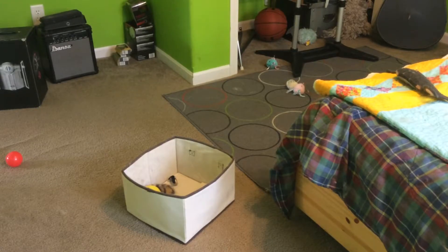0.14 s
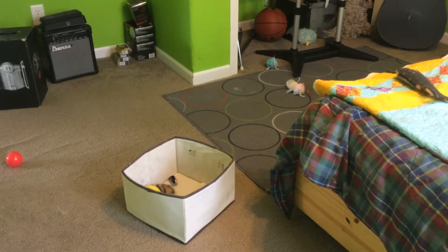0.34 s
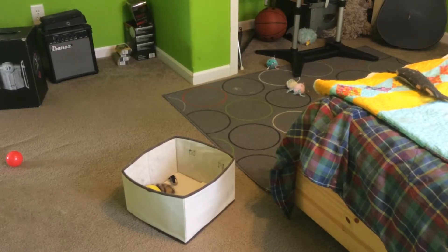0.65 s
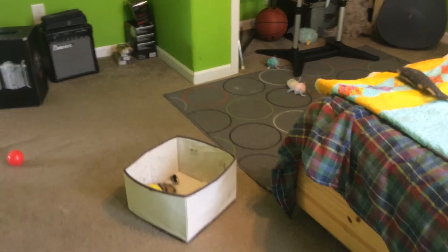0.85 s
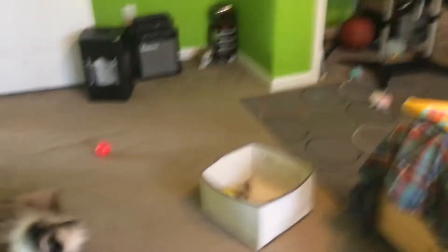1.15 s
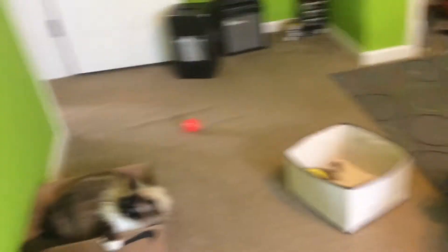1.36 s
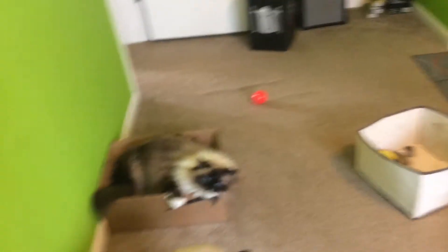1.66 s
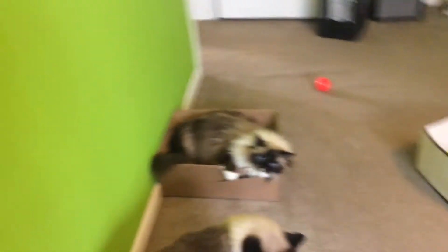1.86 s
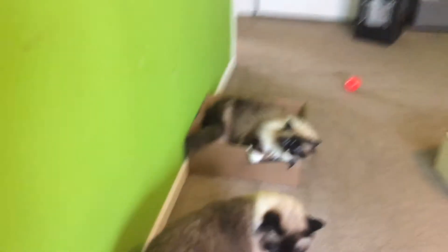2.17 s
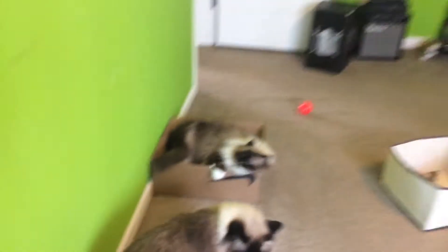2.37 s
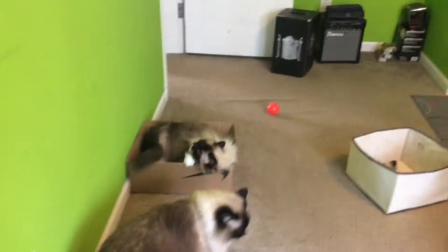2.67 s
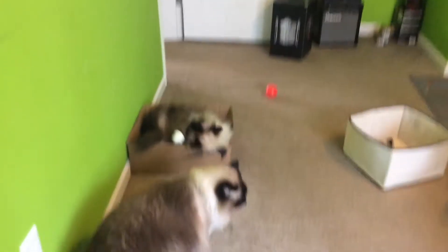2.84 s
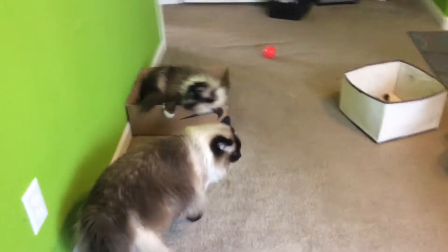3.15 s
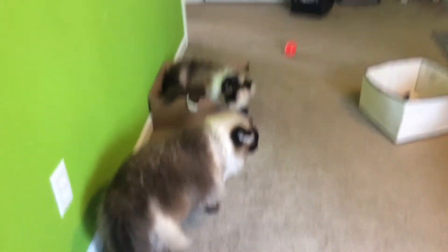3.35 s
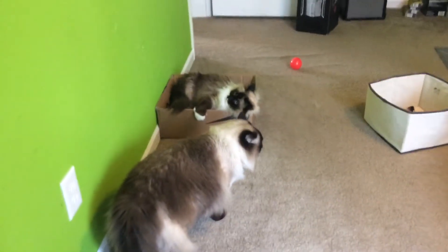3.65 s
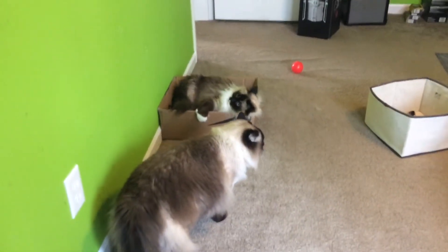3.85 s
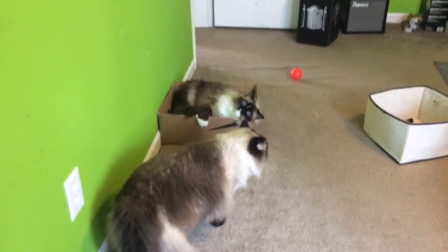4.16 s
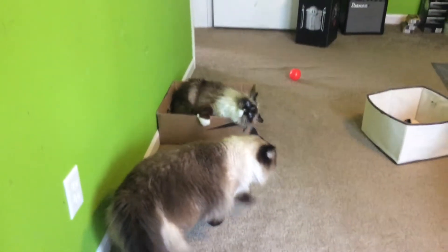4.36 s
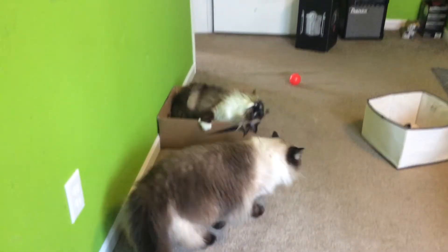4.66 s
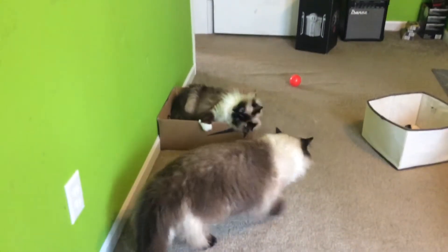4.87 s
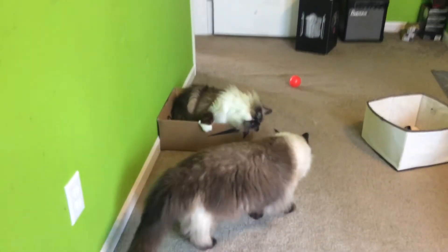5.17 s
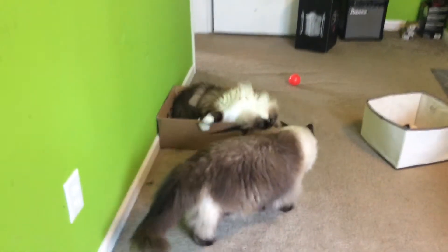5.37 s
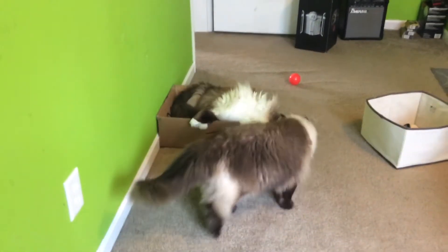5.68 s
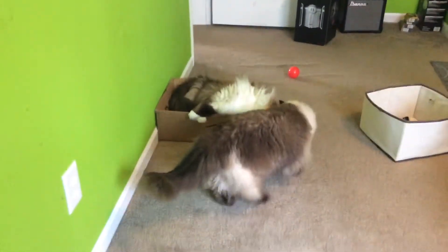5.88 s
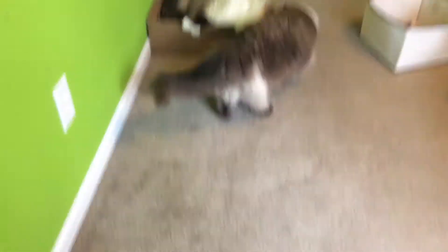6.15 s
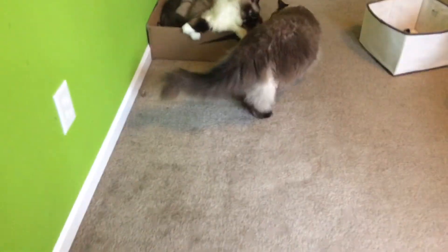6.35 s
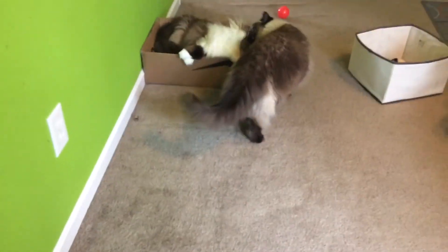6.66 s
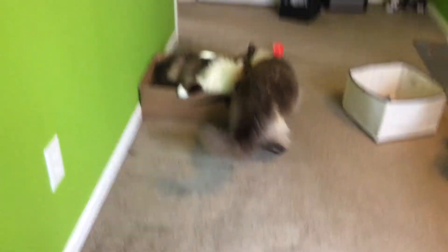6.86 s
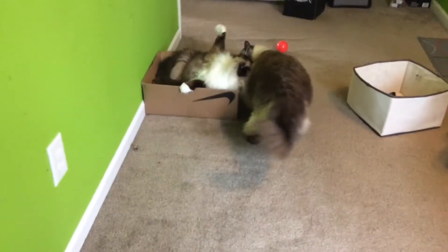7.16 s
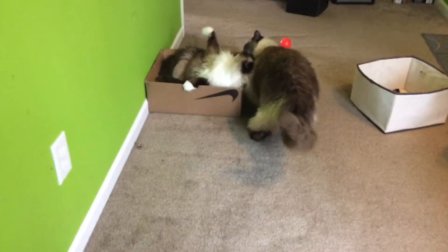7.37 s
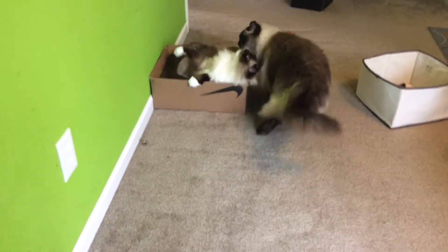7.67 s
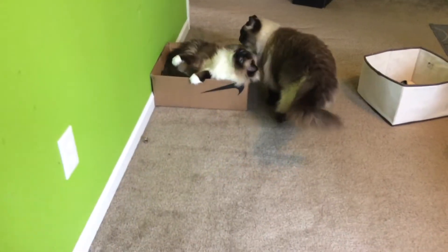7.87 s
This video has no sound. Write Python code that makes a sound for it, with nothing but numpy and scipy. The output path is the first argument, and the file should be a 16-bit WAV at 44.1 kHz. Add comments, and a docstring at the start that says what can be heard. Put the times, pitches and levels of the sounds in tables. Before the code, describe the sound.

Two cats scuffle at a cardboard box on carpet in a small, quiet room. A soft rustle and faint wash open, then a thud and a quick cluster of hollow paw knocks with claw scratches. Sparse padded bumps and light scrapes follow, then rasping claw drags, a run of harder knocks with a brief rip, and a final sharp crack. Close, dry microphone with faint hiss.

```python
"""Cats and a cardboard box

Two cats tussle at a cardboard box on the carpet of a quiet room.
Paw blows and padded bumps ring damped panel modes over a low thump; thuds are single low modes.
Claws catch, skip, snap, flick and rip as filtered slips and bursts; strokes and drags are swelling
coloured grains. Fur brushes and a low shuffle are shaped noise, as are a steady faint hiss and airy
noise, with a louder wash at the start that fades.
"""
import sys
import numpy as np
from scipy import signal
from scipy.fft import rfft, irfft, next_fast_len
from scipy.io import wavfile
from scipy.ndimage import map_coordinates

SR = 44100
rng = np.random.default_rng(int(sys.argv[2]) if len(sys.argv) > 2 else 0)


def inscribe(sig):
    """Save sig as 16-bit PCM at rate SR to the path in sys.argv[1].

    A 1-D sig is mono; a 2-D sig holds one channel per row.
    Samples are clipped to [-1, 1] before scaling.
    """
    pcm = np.round(np.clip(np.atleast_2d(sig).T, -1, 1) * 32767)
    wavfile.write(sys.argv[1], SR, pcm.astype(np.int16))


N = 353682
TIME_S = np.arange(N) / SR
AGE_S = np.arange(SR // 4) / SR  # time since a contact

# Spectrum of airy noise and of fur rustle. Each row: frequency in Hz, relative level in dB.
AIR_SPECTRUM = [(150, -29), (250, -7), (351, -4), (386, -6.5), (576, -8), (690, -5.5), (1380, -15.5),
                (1630, -13), (2130, -19), (4500, -27.5), (5850, -44), (9900, -120)]
# Spectrum of hiss and of fur fizz. Each row: frequency in Hz, relative level in dB.
HISS_SPECTRUM = [(1760, -4), (3000, -2.5), (3400, -1), (3860, -1.5), (4570, -4), (5140, -1), (7050, -5.5),
                 (8700, -2), (9400, -2), (11900, -5.5), (13200, -17.5), (15100, -15.5), (16000, -34.5)]
# Resonances of the hollow of the box, before through() scales them. Each row: frequency in Hz, gain in dB.
HOLLOW_MODES = [(250, -4.5), (350, 5.5), (510, -4), (740, 1), (980, -4), (1300, -3), (1800, -1.5),
                (2300, 1), (3000, 0.5), (3600, 2), (4300, 1), (5500, 2.5), (8000, 1.5)]


def blows(knock_lead_s=0.0011, claw_lead_s=0.0008):
    """A paw scuffs in and strikes the box: the panel knocks and a claw sets the stiff card ringing."""
    # Paw blows. Each row: start in seconds, knock level in dB, panel pitch in Hz, t60 in seconds,
    # thump level in dB (before the cut in knock), claw level in dB (before the cut in claw and the card),
    # claw pitch in Hz, chatter length in seconds.
    hits = [(0.918, -40, 460, 0.013, -53, -51, 1613, 0.035),
            (1.1488, -31.5, 374.5, 0.053, -42, -44, 1460, 0.023),
            (1.218, -28.5, 326, 0.041, -43, -45.5, 1553, 0.046),
            (1.26, -32, 293, 0.052, -37, -48, 1486, 0.03),
            (1.436, -31.5, 366, 0.011, -49, -56.5, 1090, .014),
            (1.494, -40.5, 325, 0.019, -37.5, -69, 1500, 0.013),
            (1.895, -44.5, 522, 0.041, -51, -50, 1215, 0.069),
            (2.235, -33.5, 302, 0.013, -37, -61, 1485, 0.015),
            (2.435, -41, 350, 0.046, -54, -61.5, 1485, 0.024),
            (2.666, -55, 274, 0.065, -43, -45.5, 1074, 0.045),
            (3.005, -43, 455, 0.0033, -61, -57.5, 940, 0.026),
            (3.118, -40, 540, 0.012, -45, -47.5, 1592, 0.034),
            (4.848, -50, 211, 0.035, -67, -60, 1020, 0.014),
            (5.656, -51, 323, 0.013, -41.5, -52.5, 1170, 0.024),
            (5.776, -38.5, 384, 0.0093, -40, -43, 1130, 0.015),
            (6.053, -37, 473, 0.013, -37.5, -59.5, 1900, 0.012),
            (6.103, -38, 510, 0.012, -39, -57, 1423, 0.019),
            (6.191, -31, 408, 0.012, -34.5, -61.5, 1550, 0.022),
            (6.3132, -24, 323, 0.022, -37.5, -48, 1508, 0.024),
            (6.558, -17.5, 397, 0.015, -27.5, -40, 1395, 0.019),
            (7.473, -33.5, 380, 0.024, -37.5, -36, 1308, 0.016)]
    # Resonances of the stiff card, before through() scales them. Each row: frequency in Hz, gain in dB.
    card_modes = [(400, 0), (600, 2), (900, -4), (1080, -1), (1280, -6), (1520, 5), (1750, -4), (2150, -7),
                  (2450, 3), (2700, -3), (3000, 1.5), (3600, 0), (8000, 0)]
    scuff_rise_s, scuff_fall_s = 0.011, 0.079  # the paw slides through each blow
    scuff_base_db, scuff_db_per_claw_db = -32, 0.48
    knocks, scratches = np.zeros((2, N))
    for s, db, hz, t60_s, thump_db, claw_db, claw_hz, chatter_s in hits:
        add(knocks, s - knock_lead_s, knock(db, hz, t60_s, thump_db))
        add(scratches, s - claw_lead_s, claw(claw_db, claw_hz, chatter_s))
        scuff_db = scuff_base_db + scuff_db_per_claw_db * claw_db
        scuff = stroke(scuff_rise_s, scuff_fall_s, scuff_db, claw_hz, body_db=5.5, fizz_db=2.5)
        add(scratches, s - scuff_rise_s, scuff)
    return knocks + through(scratches, card_modes)


def bumps(lead_s=0.0016, t60_s=0.031, faint_db=8, faint_hz=280, faint_thump_db=2, spread=0.38, count=10):
    """Padded bumps of the panel, plus faint ones at random times, louder where the cats move more."""
    # Bumps of a body or a soft paw. Each row: start in seconds, level in dB, panel pitch in Hz,
    # thump level in dB (before the cut in knock).
    padded = [(1.159, -30, 387, -50), (1.166, -37.5, 387, -51), (1.223, -23.5, 246, -32),
              (1.2306, -52, 242, -39), (1.242, -39.5, 417, -47), (1.343, -41.5, 293, -62),
              (1.383, -43.5, 287, -56), (1.413, -44, 259, -57), (2.142, -43, 208, -40),
              (2.177, -37, 240, -41), (2.195, -37, 248, -40), (3.196, -61, 190, -42.5),
              (3.234, -56, 203, -37.5), (3.314, -52, 295, -68), (3.349, -47.5, 312, -61),
              (3.44, -47.5, 264, -50.5), (3.715, -42.5, 370, -52), (4.006, -54.5, 335, -62),
              (4.075, -46.5, 204, -52.5), (4.324, -46.5, 219, -48), (4.45, -48.5, 181, -66),
              (4.615, -46.5, 229, -46), (4.739, -41, 210, -47), (5.157, -42, 223, -59),
              (5.312, -39.5, 170, -57), (5.538, -41.5, 340, -64), (5.566, -38, 295, -37.5),
              (6.436, -37, 259, -55), (6.533, -42, 326, -44), (6.569, -32.5, 265, -33.5),
              (6.926, -53, 198, -47.5), (7.13, -47.5, 337, -52), (7.382, -43.5, 228, -46.5),
              (7.736, -33, 330, -38.5), (7.799, -62, 270, -47.5)]
    faint = []
    for s in rng.random(count) * N / SR:
        hz = faint_hz * np.exp(spread * rng.normal())
        faint.append((s, movement_db(s) + faint_db, hz, movement_db(s) + faint_thump_db))
    out = np.zeros(N)
    for s, db, hz, thump_db in padded + faint:
        add(out, s - lead_s, knock(db, hz, t60_s, thump_db))
    return out


def knock(db, hz, t60_s, thump_db, upper_db=-13, upper_ratio=1.588, thump_hz=90, thump_gain_db=-6,
          flap_hz=145, flap_db=-1):
    """A bump flexes a damped panel; the weight behind it sways the whole box in two low modes."""
    upper_change, shape, detune = rng.standard_normal(3)
    panel = ring(hz, t60_s, attack_s=0.0022)
    upper_hz = hz * upper_ratio * np.exp(0.14 * shape)
    upper = amp(upper_db + 2 * upper_change) * ring(upper_hz, t60_s, attack_s=0.0039)
    load = np.exp(0.21 * detune)  # the cat's weight shifts the low modes
    sway = ring(thump_hz * load, t60_s=0.069, attack_s=0.012)
    flap = amp(flap_db) * ring(flap_hz * load, t60_s=0.04, attack_s=0.017)
    return amp(db) * (panel + upper) + amp(thump_db + thump_gain_db) * (sway - flap)


def claws(tick_count=5, tick_loss_db=3.5, tick_s=0.0017, ring_t60_s=0.03, ring_attack_s=0.0015):
    """Catches, alone or along with a blow, each with a brief ring at its pitch; skips of ever weaker ticks."""
    # Catches, alone or along with a blow. Each row: start in seconds, level in dB (before the cut in claw),
    # pitch in Hz, chatter length in seconds, ring level in dB.
    catches = [(1.019, -57, 1536, 0.034, -50), (1.149, -56, 2540, 0.022, -52.5),
               (1.2145, -51.5, 2830, .02, -56), (2.559, -65.5, 4070, 0.022, -52.5),
               (3.7, -69, 3080, 0.051, -63), (3.735, -63.5, 4900, 0.023, -58),
               (4.615, -76.5, 1510, 0.026, -67), (4.801, -61, 1900, 0.014, -58),
               (4.847, -58.5, 1904, 0.022, -51), (5.2363, -41.5, 765, 0.029, -41.5),
               (7.418, -55, 1270, 0.0046, -70), (7.4448, -54.5, 2330, 0.0063, -52),
               (7.7364, -42.5, 1450, 0.01, -43)]
    # Skips along the card. Each row: start in seconds, first tick level in dB (before the cut in claw),
    # pitch in Hz, gap in seconds.
    skips = [(6.205, -62.5, 6100, .0087)]
    out = np.zeros(N)
    for s, db, hz, chatter_s, ring_db in catches:
        card_ring = amp(ring_db) * ring(hz, ring_t60_s, ring_attack_s)
        add(out, s, claw(db, hz, chatter_s) + card_ring)
    for s, db, hz, gap_s in skips:
        for k in range(tick_count):
            add(out, s + k * gap_s, claw(db - k * tick_loss_db, hz, tick_s))
    return out


def claw(db, hz, chatter_s, level_db=-14, jitter=0.18, scatter_db=3, fall_db=50, bite=0.089, count=80):
    """A claw bites in and chatters over the card in uneven, dying slips; the shortest are all but one snap."""
    # Colour of card under a claw. Each row: multiple of the pitch, level in dB.
    catch_colour = [(.05, -41), (.25, -2.5), (.47, 4), (.75, 3), (1, -1), (1.45, -5), (1.85, -9),
                    (2.3, -23), (4.2, -28.5), (5, -46), (7, -45), (12, -61)]
    gap, force = rng.standard_normal((2, count))
    gaps_s = np.exp(jitter * gap) / hz
    ends_s = np.cumsum(gaps_s)
    when_s = ends_s - gaps_s[0]
    bite_in = 1 - np.exp(-ends_s / (bite * chatter_s))
    sizes = bite_in * amp(scatter_db * force - fall_db * when_s / chatter_s)
    slips = np.bincount(np.round(when_s * SR).astype(int), sizes, len(AGE_S))[:len(AGE_S)]
    sound = signal.fftconvolve(slips, click(catch_colour, hz))[:len(AGE_S)]
    return amp(db + level_db) * unit(flap_echo(sound, share=0.34))


def snaps(energy_length_s=0.0019, allpass_pole=0.83):
    """A bent claw lets go of the card's edge in one dry crack; its treble arrives ahead of its bass."""
    # Cracks. Each row: start in seconds, level in dB, brightness as a stretch of the spectrum.
    cracks = [(5.2166, -30, 0.96), (7.6708, -20, 1)]
    # Spectrum of a crack. Each row: frequency in Hz, relative level in dB.
    crack_spectrum = [(100, -25), (350, -6.5), (520, -23.5), (800, -6.5), (1150, 2), (1600, -9),
                      (2300, -7.5), (2800, -25.5), (3100, -19), (4700, -34), (6100, -27), (8500, -45),
                      (14000, -70)]
    out = np.zeros(N)
    for s, db, brightness in cracks:
        crack = signal.lfilter([-allpass_pole, 1], [1, -allpass_pole], click(crack_spectrum, brightness))
        add(out, s, amp(db) * np.sqrt(energy_length_s * SR) * crack / np.linalg.norm(crack))
    return out


def ticks(decay_s=0.0035, spiky_db=4):
    """A claw tip flicks over a few fibres: a short, broad scratch."""
    # Light flicks. Each row: time of the peak in seconds, level in dB.
    flicks = [(1.107, -65), (1.213, -45.5), (1.234, -49), (1.271, -52), (1.497, -48), (2.137, -56.5),
              (2.176, -58), (2.667, -49), (3.121, -60), (3.172, -54.5), (4.616, -60.5), (4.848, -57),
              (5.57, -59), (5.635, -50.5), (5.647, -62), (5.709, -66), (5.839, -55.5), (5.853, -56.5),
              (5.872, -51), (5.919, -54.5), (6.079, -48), (6.118, -55), (6.134, -58), (6.156, -58),
              (6.193, -49), (6.301, -56), (6.322, -43.5), (6.536, -52), (6.562, -42.5), (6.571, -52)]
    # Spectrum of a flick. Each row: frequency in Hz, relative level in dB.
    flick_spectrum = [(100, -20), (400, 11.5), (900, -9.5), (1500, 0), (2300, -10.5), (3500, -10),
                      (5200, -21), (7000, -26), (12000, -43)]
    out = np.zeros(N)
    t = AGE_S - AGE_S.mean()
    swell = np.exp(-np.abs(t / decay_s))
    for s, db in flicks:
        slips, force = rng.standard_normal((2, len(t)))
        scratch = coloured(slips * amp(spiky_db * force), flick_spectrum)
        add(out, s + t[0], amp(db) * scratch * swell)
    return out


def scrapes(grip_db=1.2, grip_knots_per_s=220):
    """Longer strokes along the card sound through the hollow of the box; the grip varies unevenly."""
    # Strokes. Each row: time of the hardest press in seconds, rise in seconds, fall in seconds,
    # level in dB (before the hollow), centre in Hz, low body in dB, high fizz in dB.
    strokes = [(.68, 0.042, 0.11, -53.5, 1080, 1, -5), (1.902, .12, 0.11, -79, 1230, 9, 9),
               (2.686, .016, 0.064, -57, 1080, -11, -8), (2.915, 0.028, 0.067, -64.5, 1700, -0.5, 7),
               (3.164, 0.042, 0.044, -59.5, 1700, 0, 7), (4.355, 0.058, 0.24, -57, 990, -1, -2),
               (4.551, 0.027, 0.053, -71, 890, -14, -3), (4.746, 0.016, 0.19, -53.5, 696, 3.5, -6),
               (4.869, 0.021, 0.063, -59.5, 1770, -7, -4), (4.966, 0.046, 0.067, -66, 1090, -12, -3),
               (5.266, 0.007, 0.041, -40.5, 1270, -1, -14), (5.363, 0.025, 0.05, -46, 1260, -4, -7),
               (7.471, 0.088, 0.89, -64.5, 1520, -14, -3)]
    out = np.zeros(N)
    for s, rise_s, fall_s, db, hz, body_db, fizz_db in strokes:
        add(out, s - rise_s, stroke(rise_s, fall_s, db, hz, body_db, fizz_db))
    grip = amp(grip_db * wobble(grip_knots_per_s))
    return through(out * grip, HOLLOW_MODES)


def stroke(rise_s, fall_s, db, hz, body_db, fizz_db, start_db=-14, end_db=-22, roundness=0.81,
           grains_per_s=9000, grain_db=-1.5, smooth=0.12):
    """A stroke plucks a dense run of fibres, swelling with the pressure and letting go."""
    # Colour of card under a stroke. Each row: multiple of the centre frequency, level in dB.
    rub_colour = [(.05, -7), (.28, 0.5), (.48, -4), (.7, -9), (.92, -6.5), (1.3, -12), (1.7, -17),
                  (2.3, -18), (3.5, -25), (5.5, -31), (7.5, -28), (10, -39)]
    t = np.arange(-rise_s, fall_s, 1 / SR)
    plucked = rng.random(len(t)) < grains_per_s / SR
    force, sign, fur = rng.standard_normal((3, len(t)))
    grains = plucked * np.sign(sign) * amp(grain_db * force) + smooth * fur
    rise_db = start_db * np.abs(t / rise_s) ** roundness
    fall_db = end_db * np.abs(t / fall_s) ** roundness
    pressure = amp(np.where(t < 0, rise_db, fall_db)) * signal.windows.tukey(len(t), 0.15)
    colour = tilted(rub_colour, body_db, fizz_db)
    return amp(db) * pressure * coloured(flap_echo(grains, share=0.33), colour, hz)


def drags(fade_in_s=0.0029, grain_db=1.0, release_db=20, grip_db=1.0, grip_knots_per_s=320):
    """A hooked claw is pulled over the card: the rasp swells, climbs as the paw speeds up, and slips off."""
    # Hard drags. Each row: start in seconds, length in seconds, release in seconds,
    # final level in dB (before the hollow), swell in dB, swell shape (1 steady, more = early),
    # first centre in Hz, last centre in Hz, low body in dB, high fizz in dB.
    pulls = [(5.219, 0.039, 0.056, -41.5, 4.5, 5.3, 1000, 1140, 6.5, 0.5),
             (5.372, 0.072, 0.019, -42, 16, 2.6, 1250, 1460, 1.5, 0),
             (7.681, 0.059, 0.014, -38.5, 14, 4.9, 1130, 1285, -2, -6.5),
             (7.718, 0.018, 0.02, -43.5, 13, 1, 2450, 2730, 1, -19)]
    # Colour of card under a drag. Each row: multiple of the centre frequency, level in dB.
    drag_colour = [(.08, -7.5), (.25, -3.5), (.45, -7.5), (.7, -2.5), (1, 1.5), (1.35, -1.5), (1.7, -13),
                   (2.4, -18), (3.2, -23.5), (5, -26.5), (7.5, -33), (10, -39.5)]
    out = np.zeros(N)
    for s, length_s, release_s, db, swell_db, shape, start_hz, end_hz, body_db, fizz_db in pulls:
        t = np.arange(0, length_s + 3 * release_s, 1 / SR)
        travel = np.minimum(t / length_s, 1)
        slips, force = rng.standard_normal((2, len(t)))
        fibres = slips * amp(grain_db * force)
        colour = tilted(drag_colour, body_db, fizz_db)
        low = coloured(fibres, colour, start_hz)
        high = coloured(fibres, colour, end_hz)
        rasp = unit((1 - travel) * low + travel * high)
        pressure_db = -swell_db * (1 - travel) ** shape
        pressure_db -= release_db * np.maximum(t - length_s, 0) / release_s
        add(out, s, amp(db + pressure_db) * np.minimum(t / fade_in_s, 1) * rasp)
    grip = amp(grip_db * wobble(grip_knots_per_s))  # the claw sticks and slips
    return through(out * grip, HOLLOW_MODES)


def rips(lead_s=0.01, tail_t60_s=0.18, edge=3, reach=1.5):
    """A few milliseconds of tearing fibres that may ring the card and leave a short sizzle in the room."""
    # Rips. Each row: time of the centre in seconds, level in dB, half length in seconds,
    # ringing of the card 0-1, sizzle relative to the rip in dB.
    tears = [(1.2405, -33.5, 0.002, 0, -21), (6.595, -33, 0.0036, 1, -14.5)]
    # Spectrum of a rip. Each row: frequency in Hz, relative level in dB.
    rip_spectrum = [(500, -4), (1100, -8.5), (1500, -0.5), (2200, -3.5), (3200, -9), (3800, -12.5),
                    (5200, -11.5), (8000, -15), (11000, -17.5), (16000, -29)]
    # Ringing of the card at full amount. Each row: frequency in Hz, gain in dB.
    ring_modes = [(600, -3), (950, -8), (1250, 2.5), (1520, 8.5), (1800, 1), (2200, -5), (2500, -2),
                  (2900, -10), (3550, 8), (4200, 4), (4950, 7), (5500, -2), (6400, -19), (7700, 3),
                  (12000, 0.5)]
    # Spectrum of the sizzle. Each row: frequency in Hz, relative level in dB.
    sizzle_spectrum = [(880, -44), (1500, -18), (2140, -20), (3600, -5), (4900, -11), (6000, -20),
                       (8830, -16), (11300, -18), (16000, -42)]
    out = np.zeros(N)
    t = AGE_S - lead_s
    for s, db, half_s, ringing, tail_db in tears:
        tear, sizzle = rng.standard_normal((2, len(t)))
        swell = 1 / (1 + np.abs(t / half_s) ** edge)
        phase = np.angle(rfft(tear * swell))
        flat = irfft(np.exp(1j * phase), len(t))  # the tear excites all frequencies alike
        brief = flat / (1 + np.abs(t / (reach * half_s)) ** edge)
        card_ring = [(hz, ringing * level_db) for hz, level_db in ring_modes]
        burst = through(through(brief, rip_spectrum), card_ring)
        burst = burst * np.linalg.norm(swell) / np.linalg.norm(burst)
        tail = coloured(sizzle, sizzle_spectrum) * (t > 0) * amp(tail_db - 60 * t / tail_t60_s)
        add(out, s - lead_s, amp(db) * (burst + tail))
    return out


def floor_thud():
    """A soft weight comes down on the carpet and the floor under it booms briefly."""
    # A cat's weight lands. Each row: start in seconds, level in dB, pitch in Hz, attack in seconds,
    # t60 in seconds.
    landings = [(.886, -34.5, 77, 0.038, 0.082), (6.562, -41, 62, 0.015, 0.11)]
    out = np.zeros(N)
    for s, db, hz, attack_s, t60_s in landings:
        add(out, s, amp(db) * ring(hz, t60_s, attack_s))
    return out


def brushes():
    """Fur slides past in a soft swell: a mid rustle with fizz on top."""
    # Fur past card and carpet. Each row: time of the peak in seconds, half length in seconds,
    # rustle level in dB, brightness as a stretch of the rustle spectrum, fizz level in dB.
    passes = [(0.121, 0.2, -60.5, 0.96, -71.5), (0.559, 0.087, -55, 0.81, -69.5),
              (1.076, 0.27, -62.5, 1.14, -74.5), (1.332, 0.17, -65, 1.13, -71),
              (1.88, 0.082, -70, 2.7, -65), (2.195, 0.069, -64.5, 1.1, -69.5), (2.62, 0.11, -73, 2.3, -73),
              (3.122, 0.24, -69, 1.24, -71.5), (3.545, 0.14, -67.5, 3, -74),
              (3.785, 0.032, -71.5, 5.3, -84), (4.035, 0.1, -73.5, 2, -99), (5.381, 0.3, -63.5, 1.33, -70),
              (7.287, 0.073, -70, 2.8, -96), (7.482, 0.1, -61, 1.45, -73)]
    out = np.zeros(N)
    t = np.arange(-SR // 2, SR // 2) / SR
    for s, half_s, db, brightness, fizz_db in passes:
        rustle, fizz = rng.standard_normal((2, SR))
        sound = amp(db) * coloured(rustle, AIR_SPECTRUM, brightness)
        sound += amp(fizz_db) * coloured(fizz, HISS_SPECTRUM)
        swell = np.exp(-(t / half_s) ** 2)
        add(out, s + t[0], (sound * swell)[t >= -s])
    return out


def movement_db(s):
    """Level of the cats' shuffling at time s, joined by straight lines."""
    # Weight shifting on the carpet. Each row: time in seconds, level of the low shuffle in dB.
    shifts = [(0.0, -61), (1.03, -57), (1.34, -52.5), (1.58, -63.5), (1.92, -63), (2.17, -60),
              (2.48, -66.5), (2.88, -66), (3.21, -56), (3.46, -67.5), (3.84, -67.5), (4.44, -63.5),
              (5.05, -68.5), (5.41, -54), (5.83, -67), (7.44, -65.5), (7.57, -66), (8.02, -74.5)]
    return np.interp(s, *np.transpose(shifts))


def background(lumps_db=3, air_drift_db=1):
    """Lumpy low shuffling; a steady faint hiss and airy noise, with a louder wash at the start that fades."""
    # Spectrum of the shuffle. Each row: frequency in Hz, relative level in dB.
    shuffle_spectrum = [(20, -51), (40, -16.5), (62, -2), (95, -1.5), (140, -2), (200, -6), (290, -9.5),
                        (400, -12), (700, -25), (1300, -78)]
    lumps = amp(lumps_db * wobble(35))
    shuffle = unit(coloured(rng.standard_normal(N), shuffle_spectrum) * lumps)
    air = coloured(rng.standard_normal(N), AIR_SPECTRUM) * amp(air_drift_db * wobble(8))
    hiss = coloured(rng.standard_normal(N), HISS_SPECTRUM)
    air_gain = fading_wash(steady_db=-76.5, start_db=-60, fade_db_per_s=7.5)
    hiss_gain = fading_wash(steady_db=-75, start_db=-68, fade_db_per_s=4.5)
    return amp(movement_db(TIME_S)) * shuffle + air_gain * air + hiss_gain * hiss


def fading_wash(steady_db, start_db, fade_db_per_s):
    """Gain of a steady level and a louder wash at the start that fades, the two summed in power."""
    return np.hypot(amp(steady_db), amp(start_db - fade_db_per_s * TIME_S))


def room(x):
    """The short tail of a carpeted room: noise that decays faster in the treble."""
    # Decay of the room. Each row: frequency in Hz, t60 in seconds.
    decay = [(100, 0.21), (1000, 0.14), (10000, 0.011)]
    hz, t, z = signal.stft(rng.standard_normal(SR // 2), SR, nperseg=256)
    fade = amp(-60 * t / along(decay, hz)[:, None])
    tail = signal.istft(z * fade, SR, nperseg=256)[1]
    return signal.fftconvolve(x, tail / np.linalg.norm(tail))[:N]


def flap_echo(x, share, nearest_s=0.00062, farthest_s=0.00225):
    """A card wall answers within a few milliseconds, rippling the colour anew at each contact."""
    lag = round(rng.uniform(nearest_s, farthest_s) * SR)
    return x + share * np.pad(x, (lag, 0))[:len(x)]


def through(x, body):
    """x heard through the fixed resonances of a body, all scaled by 0.99 in frequency."""
    return signal.fftconvolve(x, click(body, 0.99))[:len(x)]


def ring(hz, t60_s, attack_s):
    """One damped mode with a soft start, envelope peak 1."""
    swell = (1 - np.exp(-(AGE_S / attack_s) ** 2)) * amp(-60 * AGE_S / t60_s)
    return swell / swell.max() * np.sin(2 * np.pi * hz * AGE_S)


def tilted(spectrum, body_db, fizz_db):
    """A colour in multiples of its pitch, with body_db added below 0.8 and fizz_db above 2."""
    return [(ratio, level_db + body_db * (ratio < 0.8) + fizz_db * (ratio > 2))
            for ratio, level_db in spectrum]


def coloured(x, spectrum, scale=1):
    """x through a spectrum whose frequencies are stretched by scale, at rms 1."""
    size = next_fast_len(len(x) + 8192, real=True)
    gain = amp(along(spectrum, np.fft.rfftfreq(size, 1 / SR) / scale))
    return unit(irfft(rfft(x, size) * gain, size)[:len(x)])


def click(spectrum, scale, size=2048):
    """The causal (minimum-phase) impulse response of a spectrum stretched by scale."""
    gain = amp(along(spectrum, np.fft.rfftfreq(size, 1 / SR) / scale))
    cepstrum = irfft(np.log(gain))
    cepstrum[1:size // 2] *= 2
    cepstrum[size // 2 + 1:] = 0
    return irfft(np.exp(rfft(cepstrum)))


def wobble(knots_per_s):
    """A smooth random curve through normally distributed knots."""
    knots = rng.standard_normal(int(N * knots_per_s / SR) + 4)
    return map_coordinates(knots, [TIME_S * knots_per_s])


def along(points, hz):
    """Read (Hz, value) points on a log frequency axis."""
    f, v = np.transpose(points)
    return np.interp(np.log(hz + 1e-6), np.log(f), v)


def amp(db):
    """Decibels to gain."""
    return 10 ** (np.asarray(db) / 20)


def unit(x):
    """Scale to rms 1."""
    return x / np.sqrt(np.mean(x ** 2) + 1e-20)


def add(track, s, sound):
    """Mix a sound into the track from time s in seconds."""
    part = track[max(round(s * SR), 0):][:len(sound)]
    part += sound[:len(part)]


def scene(room_db=-24):
    """Close contacts with a faint room tail, over fur and background."""
    contacts = blows() + bumps() + claws() + snaps() + ticks()
    contacts += scrapes() + drags() + rips() + floor_thud()
    return (contacts + amp(room_db) * room(contacts) + brushes() + background())[None]


def record(dry, top_hz=15800):
    """A sharp band limit: nothing is kept from top_hz upward."""
    size = next_fast_len(N + 8192, real=True)
    keep = np.fft.rfftfreq(size, 1 / SR) < top_hz
    return irfft(rfft(dry, size) * keep, size)[:, :N]


dry = scene()
out = record(dry)
inscribe(out)
```